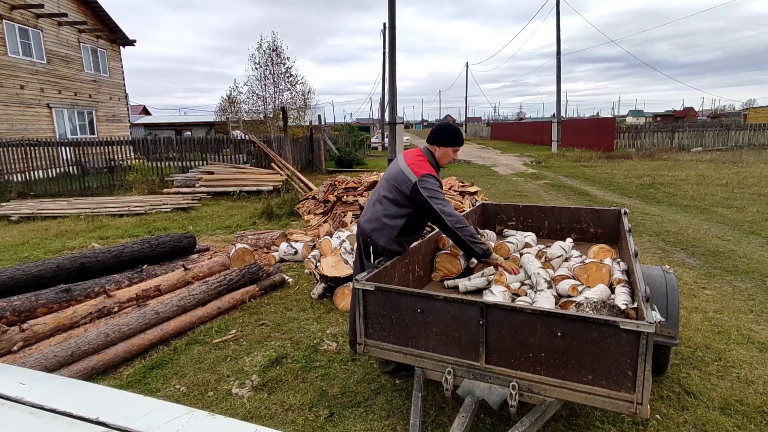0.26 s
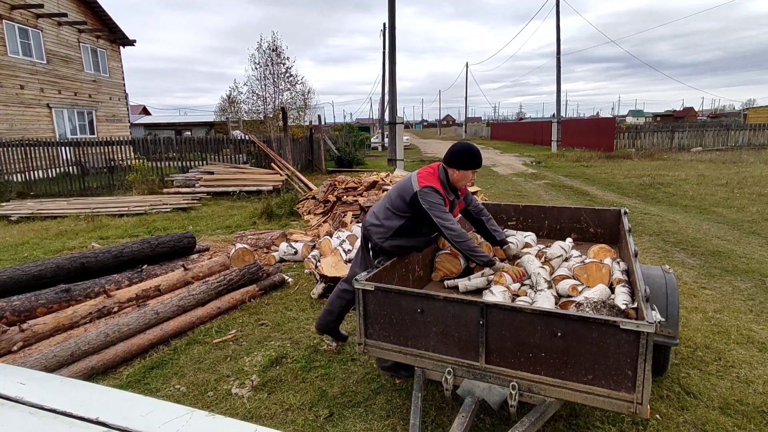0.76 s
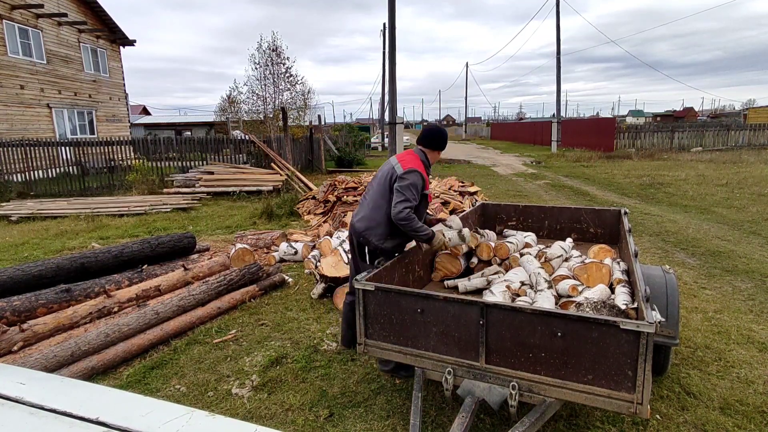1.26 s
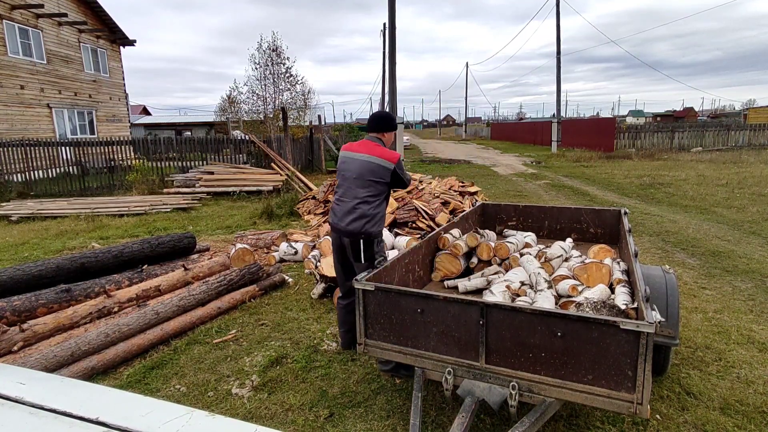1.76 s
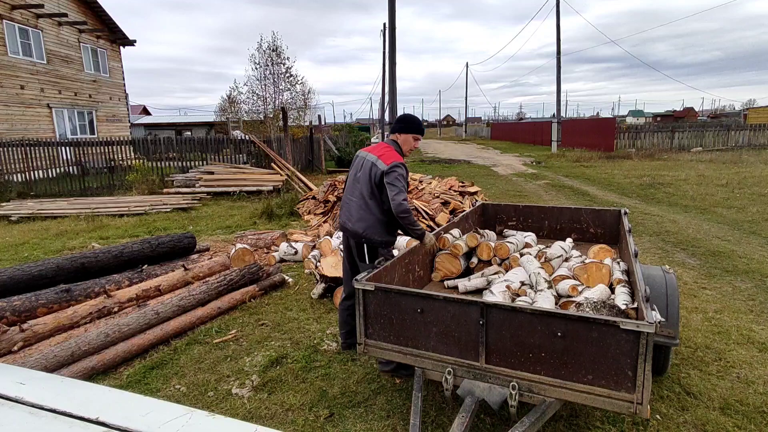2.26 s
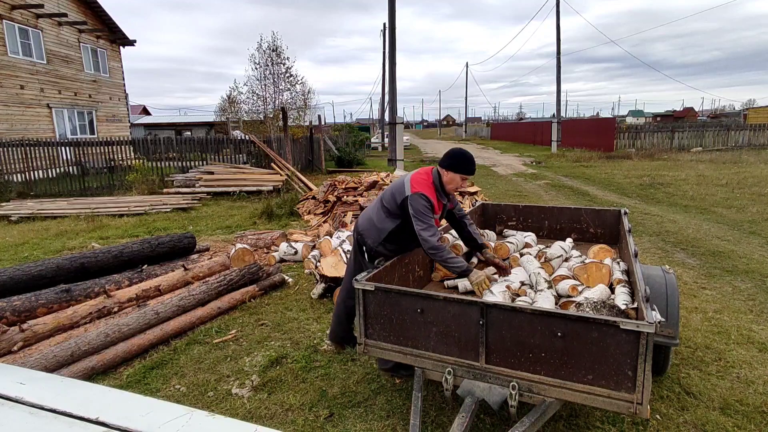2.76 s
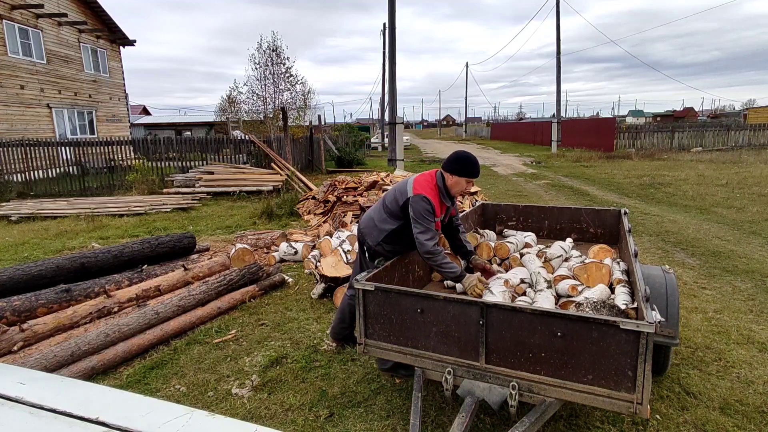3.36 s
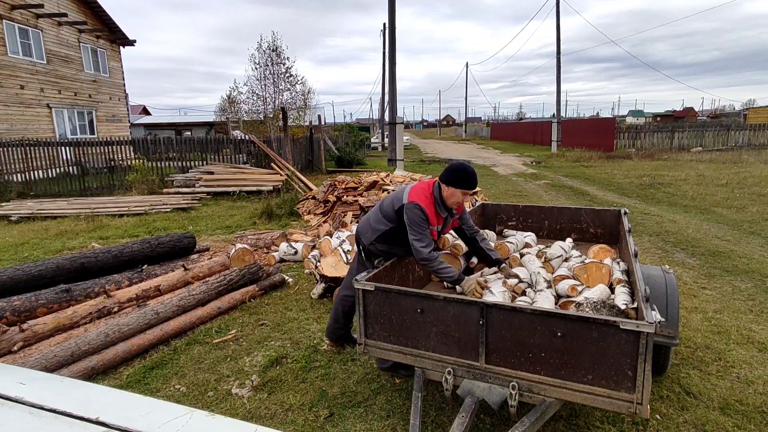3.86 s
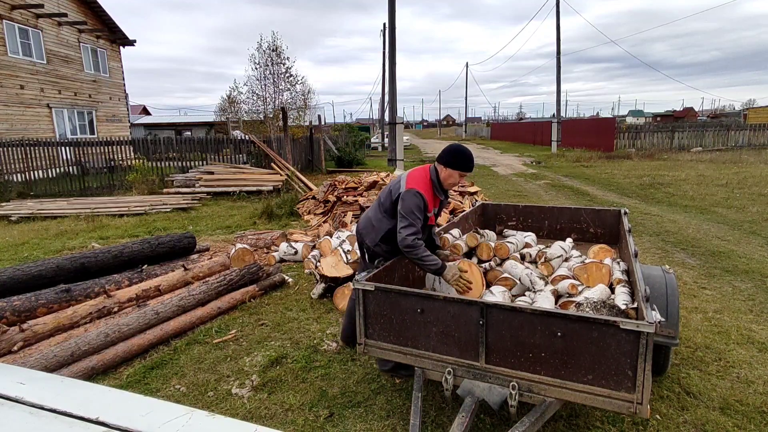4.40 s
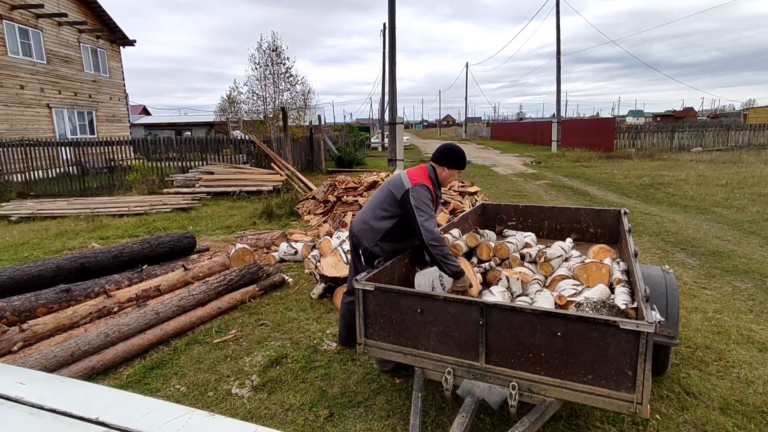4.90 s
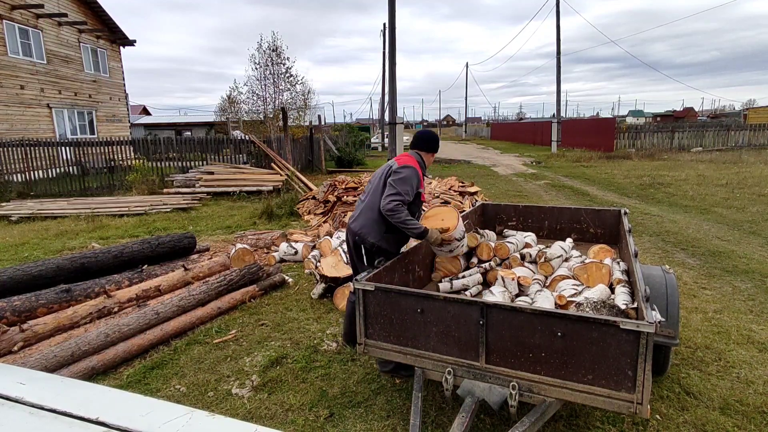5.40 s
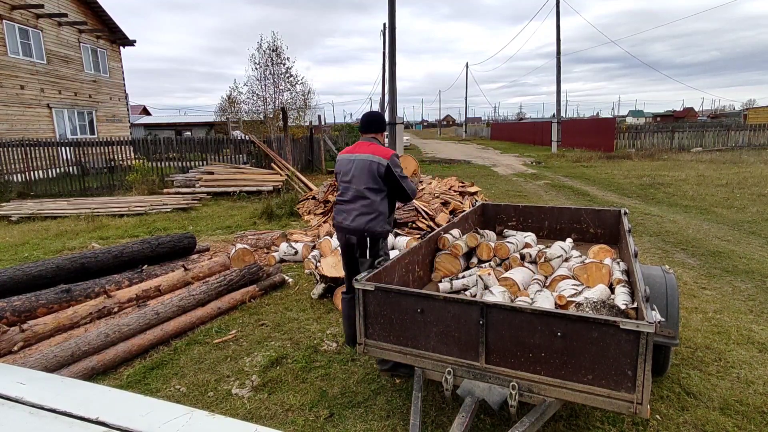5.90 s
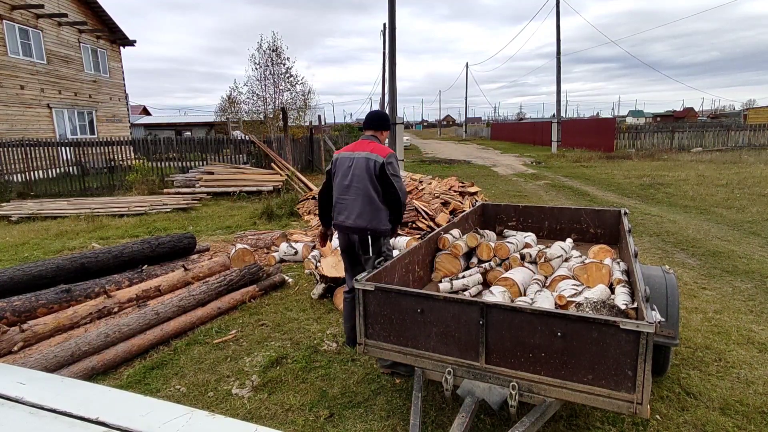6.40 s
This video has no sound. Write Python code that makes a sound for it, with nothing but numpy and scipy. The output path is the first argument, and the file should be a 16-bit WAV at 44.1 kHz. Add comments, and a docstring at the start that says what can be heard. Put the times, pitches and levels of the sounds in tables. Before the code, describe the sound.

Close-miked firewood handling in a quiet open yard. Soft bark rustles and dull knocks come first, then a sharp crack and clack as a log lands just after two seconds. More shuffling leads to grinding and two very loud hollow clunks past four and a half seconds. A faint distant saw then whines upward, and a last log lands hard near the end. Only the left channel carries the scene; the right is plain hiss.

```python
"""Split firewood knocks and rings the planks of a trailer as it is dragged out and tossed on a pile.
Blows are sums of decaying modes; grinding, bark rustle, ticks and squeaks come from friction and cracks.
A far saw whines as noise around multiples of its tooth rate; band-limited noise is the low rumble of wind
and of the trailer thumping under the logs. A clip-on microphone in a quiet yard feeds the left channel
only; the right holds just its own hiss."""
import sys
import numpy as np
from scipy import signal
from scipy.fft import rfft, irfft
from scipy.io import wavfile
from scipy.ndimage import uniform_filter1d

SR = 44100
rng = np.random.default_rng(int(sys.argv[2]) if len(sys.argv) > 2 else 0)


def store_wav(level_fs):
    """Save 16-bit WAV to argv[1]."""
    pcm = np.round(np.clip(np.atleast_2d(level_fs), -1, 1) * 32767)
    wavfile.write(sys.argv[1], SR, pcm.T.astype(np.int16))


N = 293265
T = np.arange(N) / SR

# Scene levels are relative: scene() doubles them all.
# modes of logs and planks: f/Hz, level/dB, t60/s (knocks scale level and t60 blow by blow)
WOOD_MODES = [(51, -8, 0.57), (75.1, -0.5, 0.025), (97, -3, 0.14), (118.9, -3, 0.22), (145.3, -3, 0.12),
              (166.8, -2, 0.11), (183.3, -10.5, 0.19), (233.3, -2.5, 0.17), (262.1, 0.5, 0.091),
              (329, 1.5, 0.1), (386.2, -4.5, 0.13), (422.7, -1, 0.091), (475, -2.5, 0.092),
              (550, -4.5, 0.093), (627, -6, 0.11), (753.4, -2, 0.11), (876, -3, 0.072), (1038, -3.5, 0.065),
              (1207, -7, 0.12)]


def undb(db):
    """Amplitude ratio of a level in decibels."""
    return 10 ** (np.asarray(db) / 20)


def level(x, db):
    """Scaling to a given root-mean-square level."""
    return x * undb(db) / np.sqrt(np.mean(x ** 2))


def curves(table):
    """Linear interpolation of each table column over time."""
    s, *columns = np.transpose(table)
    return [np.interp(T, s, column) for column in columns]


def band(x, lo_hz, hi_hz):
    """Band-pass filtering between two cut-off frequencies."""
    return signal.sosfilt(signal.butter(2, [lo_hz, hi_hz], "band", fs=SR, output="sos"), x)


def coloured(spectrum):
    """Spectral shaping of white noise by (f/Hz, level/dB) points, joined on a log frequency axis."""
    hz, db = np.transpose(spectrum)
    f = np.arange(N // 2 + 1) * SR / N + 1  # the 1 Hz offset avoids log(0)
    gain = undb(np.interp(np.log(f), np.log(hz), db)) * (f > 12)
    return irfft(rfft(rng.standard_normal(N)) * gain, N)


def walk(rate_hz):
    """Slow random modulation: levels drawn at the given rate and joined by ramps."""
    step = int(SR / rate_hz)
    held = np.repeat(rng.standard_normal(N // step + 1), step)
    return uniform_filter1d(held, step)[:N]


def port(x):
    """Cavity resonance: the sound inlet of the microphone lifts a band of the treble."""
    port_hz, width_hz, port_db = 9920, 760, 11.5
    resonance = signal.lfilter(*signal.iirpeak(port_hz, port_hz / width_hz, SR), x)
    return x + undb(port_db) * resonance


def add(out, s, x, peak_db):
    """Superposition of an event at its onset, scaled to a peak level."""
    i = int(s * SR)
    out[i:i + len(x)] += (x * undb(peak_db) / np.abs(x).max())[:N - i]


def strokes(s, db, rise, hold, fall, rest_db):
    """Energy sum of moves that swell, hold and die away exponentially, over a resting level."""
    s, db, rise, hold, fall = (np.reshape(c, (-1, 1)) for c in (s, db, rise, hold, fall))
    t = T[::32]
    before, after = (s - t) / rise, (t - s - hold) / fall
    away = np.maximum(np.maximum(before, after), 0)  # 1 = one rise or fall time, 20 dB down
    energy = np.sum(undb(db - 20 * away) ** 2, axis=0) + undb(rest_db) ** 2
    return np.interp(T, t, np.sqrt(energy))


def whine(phase, width_hz, db):
    """Quadrature modulation: low-pass noise on a sine and a cosine makes a band around a moving pitch."""
    low_pass = signal.butter(2, width_hz / 2, fs=SR, output="sos")
    smear = signal.sosfilt(low_pass, rng.standard_normal((2, N)))
    return level(smear[0] * np.cos(phase) + smear[1] * np.sin(phase), db)


def yard():
    """Ambient noise: a stationary spectrum seen through the inlet resonance, slowly swaying in level."""
    # spectrum of the quiet yard ahead of the inlet: f/Hz, level/dB (per Hz, shape only)
    yard_spectrum = [(30, 1), (80, -0.5), (190, -25.5), (400, -9), (800, -8), (1300, -17), (2500, -35),
                     (6000, -31), (14000, -31.5)]
    return level(port(coloured(yard_spectrum)), -67) * undb(2.3 * walk(2.99))


def rumble():
    """Band-limited low-frequency noise: wind and the trailer thumping under the logs, as one rumble."""
    # low rumble of wind and of the trailer thumping under the logs: t/s, level/dB
    rumble_course = [(0.0, -67), (1.17, -57), (1.39, -63.5), (3.11, -63), (3.58, -54.5), (3.96, -62),
                     (4.7, -47.5), (5.17, -66.5), (5.72, -63), (6.65, -58.5)]
    rumble_db = curves(rumble_course)[0] + 3.7 * walk(13)
    return undb(rumble_db) * level(band(rng.standard_normal(N), 23.4, 73), 0)


def saw():
    """Periodic cutting: noisy bands on multiples of the tooth rate, smeared and patchy, over broad hiss."""
    # far saw: t/s, tooth rate f/Hz, common level/dB, and within it overtone level/dB,
    # level/dB of the screech of the blade in the cut
    saw_course = [(4.6, 1117, -96, -8, -9), (4.9, 1114, -69, -1.5, 2), (5.3, 1110, -67.5, -7, -2),
                  (5.56, 1150, -67, -4, 3), (5.62, 1185, -66, 2, -3), (5.9, 1260, -67.5, -3.5, 0.5),
                  (6.19, 1292, -62.5, -14, 3.5), (6.24, 1287, -62.5, -11, 11.5), (6.65, 1320, -61, -6, 6)]
    # overtones: multiple of the tooth rate, width f/Hz, level/dB
    saw_orders = [(2, 120, -4), (3, 260, -8.5), (4, 120, -7.5), (6, 330, -5.5), (7, 230, -10)]
    tooth_hz, db, overtones_db, screech_db = curves(saw_course)
    phase = 2 * np.pi * np.cumsum(tooth_hz) / SR
    hiss = level(band(rng.standard_normal(N), 390, 8600), 0.23)
    fundamental = whine(phase, 440, -3.3)
    # two bands in series leave the overlap of their skirts
    upper = band(rng.standard_normal(N), 10200, 12500)
    screech = level(port(band(upper, 6100, 7700)), 0)
    overtones = np.zeros(N)
    for order, width_hz, order_db in saw_orders:
        overtones += whine(order * phase, width_hz, order_db) * undb(1.06 * walk(6))
    return undb(db) * (hiss + fundamental + undb(overtones_db) * overtones + undb(screech_db) * screech)


def grind():
    """Stick-slip friction: heavy logs on the planks drive the wood modes, the low ones most."""
    # logs grinding over the planks: t/s, level/dB, rise t/s, fall t/s (each spans 20 dB)
    drags = [(0.0, -58, .02, 0.083), (0.36, -78, .05, .1), (1.03, -63, 0.99, 0.18), (1.47, -69.5, .2, 0.53),
             (2.31, -64, .12, 0.24), (2.64, -84, .25, .16), (3.26, -57.5, 0.22, 0.19),
             (3.56, -52, 0.12, .08), (4.17, -43.5, .2, 0.45), (4.7, -37.5, 0.066, 0.33),
             (6.06, -53.5, 0.087, 0.13), (6.31, -40, 0.011, 0.18)]
    slips = rng.standard_normal(N) * undb(3.4 * walk(60))
    body = np.zeros(N)
    for hz, db, _ in WOOD_MODES:
        weight = undb(db) / (1 + (hz / 300) ** 2)
        body += weight * band(slips, hz / 1.097, hz * 1.081)
    s, db, rise, fall = np.transpose(drags)
    rest_db = -80  # between the moves
    return strokes(s, db, rise, 0, fall, rest_db) * level(body, 0)


def rustle():
    """Friction noise: dense tiny slips of uneven size merge into a bright band and a duller one."""
    # rubs of bark and sleeve: t/s, bright level/dB, rise t/s, hold t/s, fall t/s,
    # dull level/dB against the bright; rise and fall span 20 dB
    rubs = [(0.0, -58.5, .02, 0.02, .1, -5.5), (0.246, -70, .02, .01, .12, -3.5),
            (0.351, -57.5, .03, 0.079, 0.14, -6.5), (0.669, -57, 0.06, 0.0089, 0.06, -8),
            (0.923, -55, 0.18, .01, 0.08, -8), (1.02, -61.5, 0.13, 0.033, 0.06, -14),
            (1.272, -63.5, .12, 0.059, 0.13, -9.5), (1.49, -64, .04, .01, .06, -10),
            (1.78, -68, 0.28, .01, 0.081, -4), (2.026, -72.5, .1, .14, .05, -12),
            (2.266, -51, 0.0087, 0.05, 0.15, -6.5), (2.642, -64.5, 0.1, .01, 0.23, -7.5),
            (2.75, -69, .1, .13, .05, -9), (2.954, -64, 0.063, 0.0092, .03, -4.5),
            (3.037, -64, 0.041, 0.29, .1, -9.5), (3.238, -63.5, 0.05, 0.04, 0.08, 3.5),
            (3.358, -74.5, 0.056, 0.044, 0.12, 3), (3.586, -59, 0.24, 0.011, 0.044, -8),
            (3.71, -65.5, 0.035, 0.099, .1, -5.5), (3.98, -57, 0.043, 0.075, .2, -9),
            (4.153, -45, 0.27, 0.0046, 0.072, -8.5), (4.275, -51, .2, 0.0076, 0.23, -6.5),
            (4.393, -59.5, .1, .12, .2, -3.5), (4.57, -50.5, 0.075, .01, 0.086, -4),
            (4.741, -51, .18, 0.0076, 0.13, 0), (4.854, -58.5, 0.069, 0.081, 0.55, 0),
            (5.353, -59.5, 0.48, 0.71, .2, -5.5), (6.341, -50, 0.072, 0.0082, 0.084, -4),
            (6.452, -60, 0.09, 0.25, .3, -25)]
    s, db, rise, hold, fall, dull_db = np.transpose(rubs)
    slips = rng.standard_normal(N) * undb(2.1 * walk(400) + 2.4 * walk(60))
    bright = level(port(band(slips, 2940, 11050)), 0)
    dull = level(band(slips, 950, 4430), 0)
    rest_db = -81  # between the moves, in either band
    bright_gain = strokes(s, db, rise, hold, fall, rest_db)
    dull_gain = strokes(s, db + dull_db, rise, hold, fall, rest_db)
    return bright_gain * bright + dull_gain * dull


def squeaks():
    """Frictional whistling: bark slipping under load glides in pitch; longer slips stutter more."""
    # bark squeaks: t/s, peak level/dB, start f/Hz, end f/Hz, length t/s
    glides = [(2.32, -49, 2080, 1920, 0.067), (4.154, -19.5, 10400, 8050, 0.0037),
              (4.286, -33.5, 10100, 8740, 0.0041), (4.577, -55, 7300, 7260, 0.018),
              (4.733, -45.5, 7250, 7170, 0.041)]
    out = np.zeros(N)
    for s, peak_db, start_hz, end_hz, length in glides:
        n = int(length * SR)
        stutter = 1 + 25 * length * walk(255)[:n]
        phase = 2 * np.pi * np.cumsum(np.linspace(start_hz, end_hz, n)) / SR
        add(out, s, np.hanning(n) ** .5 * stutter * np.sin(phase), peak_db)
    return out


def ticks():
    """Impulsive fracture: a snap and fizz, bright through the inlet; a dull part rings the log near 2 kHz."""
    # bark ticks and cracks: t/s, bright peak level/dB, dull peak level/dB against it, t60/s of the fizz
    snaps = [(0.4252, -37, -13, 0.017), (0.4802, -50, -8, .022), (0.532, -37.5, -7.5, 0.045),
             (0.5365, -43, -2, 0.0083), (0.689, -40, -23, 0.014), (0.7466, -48, -19, 0.018),
             (0.996, -42, -17, 0.057), (1.026, -39, -24, 0.018), (1.044, -38.5, -27, 0.035),
             (1.257, -50, -16, .029), (1.4287, -55.5, -3, 0.086), (1.483, -51.5, -4, .031),
             (2.2542, -16.5, -7.5, 0.063), (2.28, -33, -3.5, 0.081), (2.308, -34.5, -19, .045),
             (2.579, -54, -7, 0.058), (3.036, -49, -13, .029), (3.239, -51, -8, 0.15),
             (3.2753, -62, -7, .021), (3.363, -45, -7, .05), (3.388, -48, -23, 0.026),
             (3.577, -48.5, -20, .032), (4.0298, -38.5, -34, 0.044), (4.138, -32, -13, .025),
             (4.149, -28, -39, .022), (4.1757, -30, -20, 0.03), (4.1954, -37.5, -12.5, .025),
             (4.2856, -40, -15, .021), (4.2992, -37, -24, 0.027), (4.415, -38, -21, 0.05),
             (4.4611, -34, -32, .018), (4.55, -33.5, -29, 0.074), (4.563, -37, -2, 0.029),
             (4.6325, -45, -30, 0.035), (4.6678, -38.5, -7.5, 0.069), (4.723, -32, 0, 0.042),
             (4.7396, -33, -30, 0.057), (4.788, -39, -27, 0.032), (4.812, -40.5, -8, 0.04),
             (4.9791, -45, -3.5, 0.081), (5.5063, -39, -34, 0.033), (6.309, -27.5, -12, 0.032),
             (6.346, -30.5, -13, 0.026), (6.4794, -34.5, 0, 0.053)]
    fizz_db = -11.5  # against the snap, before filtering
    out, t = np.zeros(N), T[:SR // 5]
    for s, peak_db, dull_db, t60 in snaps:
        burst = undb(fizz_db) * rng.standard_normal(len(t)) * 1000 ** (-t / t60)
        burst[20] += 1  # the snap
        add(out, s, port(band(burst, 5800, 14200)), peak_db)
        dull = band(burst, 1770, 2090) + 0.56 * band(burst, 650, 3000)
        add(out, s, dull, peak_db + dull_db)
    return out


def knocks():
    """Modal synthesis: a blow and its quick bounces ring the log, the planks and a crowd of high modes."""
    # log blows: t/s, peak level/dB, log pitch f/Hz, slope above that pitch (hardness) in level/dB
    # per octave, ring factor on the decay times
    blows = [(0.029, -48.5, 172, -8, 0.61), (0.471, -52, 173, -7, .6), (0.919, -42, 145, -11.5, 0.87),
             (1.044, -50, 102, -13, 0.4), (1.052, -41, 145, -10, 0.62), (1.254, -46.5, 355, -10, 0.3),
             (1.485, -44.5, 520, -5, .2), (1.491, -40, 483, -29, 0.52), (2.253, -33, 350, -18, 0.27),
             (2.275, -24, 445, -6, 0.53), (2.285, -34, 420, -11, 0.36), (2.31, -46, 297, -13, .3),
             (2.33, -56, 380, -18, 0.47), (2.341, -32, 214, -11, 0.16), (2.582, -40.5, 253, -6, 0.38),
             (2.621, -44, 252, -21, 0.35), (2.667, -45.5, 243, -34, 0.29), (3.166, -36.5, 133, -11, 0.28),
             (3.224, -49.5, 146, -9, 1.1), (3.274, -36, 580, -1, 0.51), (3.285, -41.5, 127, -1.5, 0.85),
             (3.462, -47, 210, -12, 0.73), (3.522, -41, 193, -13.5, 0.57), (3.549, -34.5, 78, -7, 0.51),
             (3.574, -46.5, 114, -27, 0.69), (3.672, -49, 316, -27, 0.55), (3.926, -44, 119.5, -12, 1.3),
             (4.034, -47.5, 116, -12, 0.9), (4.08, -44, 300, -10, 1.7), (4.119, -35, 102, -3, 1.2),
             (4.171, -43, 135, -10, 1.5), (4.224, -34, 126, -6, 1.46), (4.279, -40, 121, -9.5, 3.1),
             (4.391, -32.5, 248, -21, 1), (4.428, -34.5, 97, -12, 0.33), (4.453, -36.5, 118, -6, .71),
             (4.554, -9, 240.7, -11.5, 0.49), (4.562, -14, 179, -6.5, 0.34),
             (4.578, -20.5, 221, -8.5, 0.62), (4.682, -19.5, 216, -9.5, 0.72), (4.716, -16, 110, -6, 0.4),
             (4.726, -8, 282, -5.5, 0.47), (4.739, -15, 297, -4, 0.46), (4.788, -29.5, 116, -9, 1.26),
             (4.818, -33, 193, -15.5, 1.6), (4.888, -42.5, 155, -0.5, 0.59),
             (5.057, -41.5, 113, -4.5, 0.64), (5.755, -52.5, 103, -10.5, .72), (5.882, -46, 106, -9, 0.83),
             (6.037, -29, 187, -16.5, 1), (6.055, -39, 192, -7.5, 0.87), (6.305, -21.5, 160, -7.5, 0.35),
             (6.315, -24.5, 117, -1, 0.53), (6.324, -24, 370, -18, 0.4), (6.341, -28, 133, -3, 1.2),
             (6.37, -34, 130, -5.5, 1.2), (6.476, -11.5, 405, -9, .3), (6.483, -13, 418, -5.5, 0.08),
             (6.568, -38.5, 160, -11, 0.24), (6.617, -46, 102, -0.5, 0.34)]
    below_db_per_octave = 8.5  # fall-off under the pitch of the log
    bounce_s = .013  # time constant of the bounces for a ring factor of 1
    out, t = np.zeros(N), T[:SR // 4]
    crowd_hz = 1300 * 2 ** np.arange(0, 2.2, 1 / 16)
    crowd = np.array([crowd_hz, np.full_like(crowd_hz, -10), 75 / crowd_hz]).T
    for s, peak_db, log_hz, above_db, ring in blows:
        log_mode = [(log_hz, 2.5, .1)]
        hz, db, t60 = np.vstack([log_mode, WOOD_MODES, crowd]).T[:, :, None]
        detune, polarity, unevenness = rng.standard_normal((3, len(hz), 1))
        f = hz * (1 + 0.027 * detune)
        octaves = np.log2(f / log_hz)
        slope = np.where(octaves > 0, above_db, below_db_per_octave)
        gain = np.sign(polarity) * undb(db + 1.5 * unevenness + slope * octaves)
        decay = 1000 ** (-t / (t60 * ring))
        modes = np.sum(gain * np.sin(2 * np.pi * f * t) * decay, axis=0)
        modes *= 1 - np.exp(-t * log_hz / .5)  # the contact builds up, slower for a low-pitched log
        # a first blow, then sparse random bounces that die sooner for a dead blow
        bounces = rng.standard_normal(2048) * (rng.random(2048) < .012)
        hits = bounces * np.exp(-t[:2048] / (bounce_s * ring))
        hits[0] = 2.98
        add(out, s, signal.fftconvolve(modes, hits)[:len(t)], peak_db)
    # the load and the yard scatter each blow into a short dull tail
    tail = band(rng.standard_normal(len(t)), 196, 3300) * 1000 ** (-t / 0.21)
    return out + undb(-42.0) * signal.fftconvolve(out, tail)[:N]


def scene():
    """Linear superposition of all sources, doubled, on the left; silence on the right."""
    heard = knocks() + ticks() + squeaks() + rustle() + grind() + saw() + rumble() + yard()
    return np.array([2 * heard, np.zeros(N)])


def record(dry):
    """Independent input noise on both channels, then a steep low-pass that cuts the top."""
    # spectrum of the input hiss: f/Hz, level/dB (per Hz, shape only)
    hiss_spectrum = [(15, 6.5), (60, -16), (200, -21), (600, -31), (1500, -36), (4000, -39.5),
                     (8000, -43.5), (15000, -45.5)]
    hiss_db, top_hz = -55, 14250
    hiss = np.array([level(coloured(hiss_spectrum), hiss_db) for _ in dry])
    low_pass = signal.ellip(10, .2, 80, top_hz, fs=SR, output="sos")
    return signal.sosfilt(low_pass, dry + hiss)


dry = scene()
out = record(dry)
store_wav(out)
```